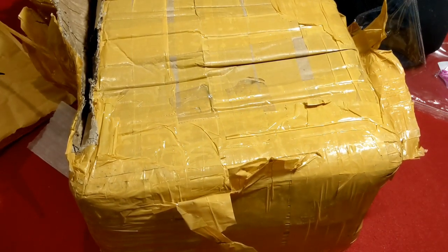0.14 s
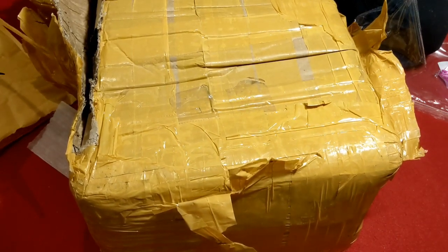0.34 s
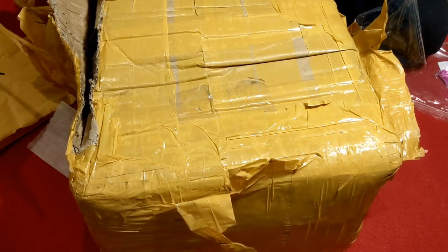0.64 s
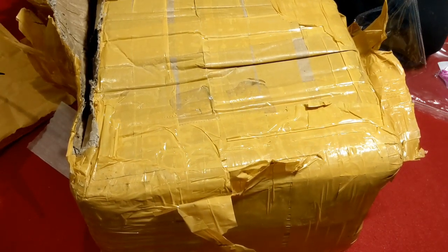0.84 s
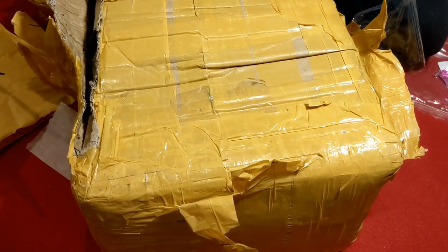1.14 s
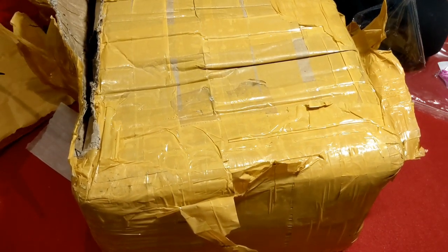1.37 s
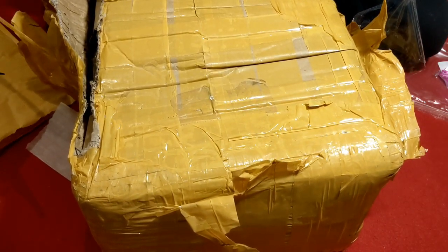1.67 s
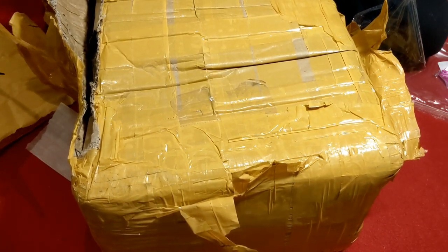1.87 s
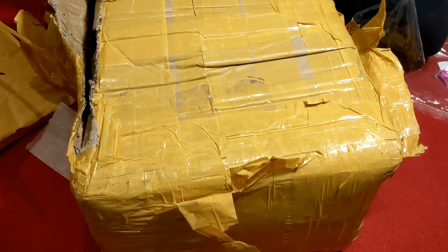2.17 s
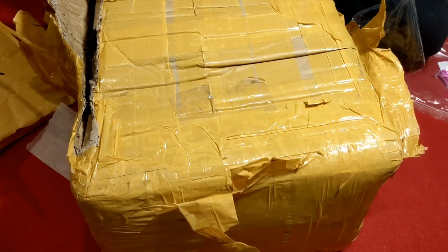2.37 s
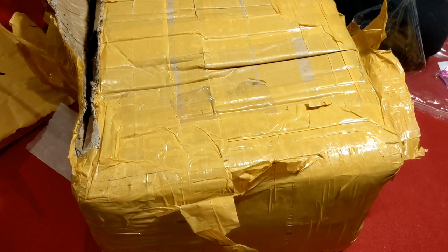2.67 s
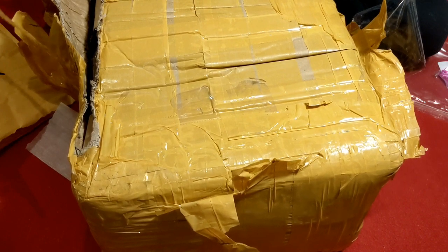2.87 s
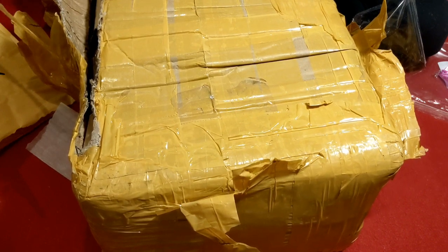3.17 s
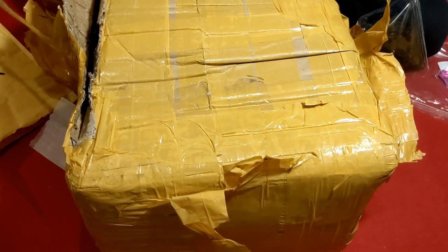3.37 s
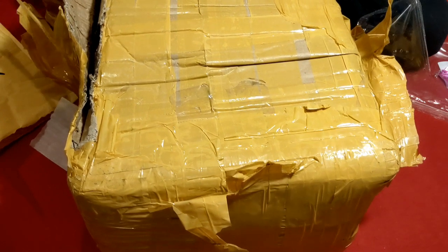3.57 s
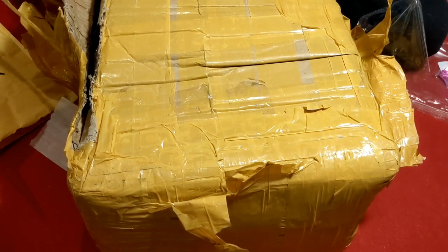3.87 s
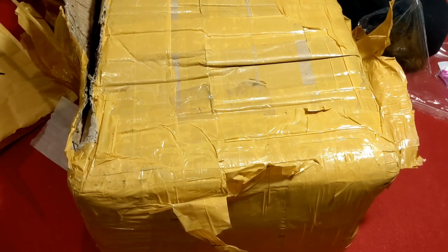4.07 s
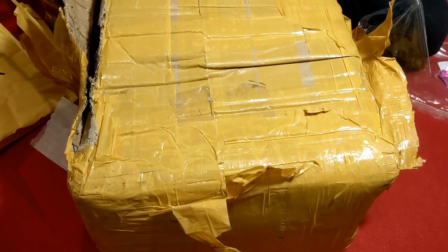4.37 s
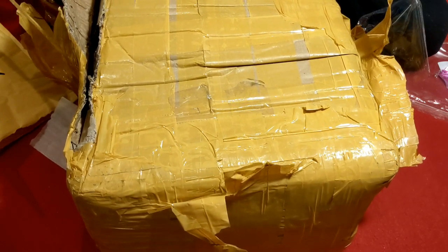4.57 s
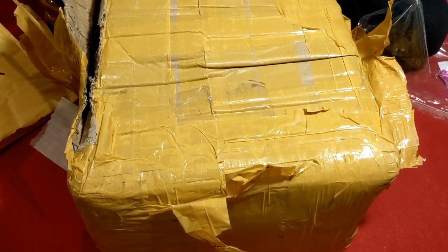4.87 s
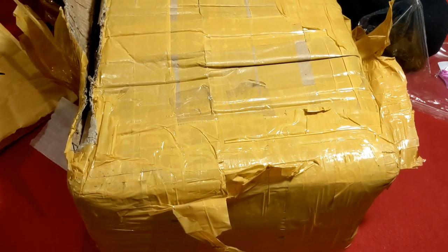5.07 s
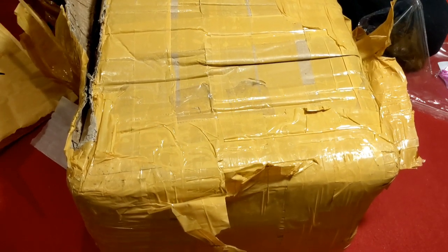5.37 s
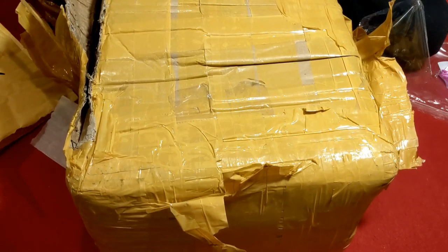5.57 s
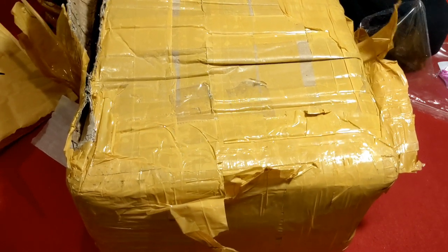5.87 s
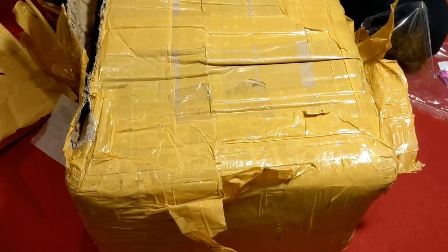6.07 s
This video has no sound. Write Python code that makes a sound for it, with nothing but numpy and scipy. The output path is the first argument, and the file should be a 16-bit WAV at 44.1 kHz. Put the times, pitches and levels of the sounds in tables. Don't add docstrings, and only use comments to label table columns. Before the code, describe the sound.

Scissors saw and pry at a taped hollow cardboard box, with dry crackles, tape snaps and hollow knocks building to hard cracks, close up indoors.

```python
import sys
import numpy as np
from scipy import signal
from scipy.fft import rfft, irfft, next_fast_len
from scipy.io import wavfile
from scipy.ndimage import uniform_filter1d, map_coordinates

SR = 44100
rng = np.random.default_rng(int(sys.argv[2]) if len(sys.argv) > 2 else 0)


def wrap_up_sound(samples):
    columns = np.atleast_2d(samples).T
    tamed = np.clip(columns, -1, 1)
    steps = np.round(tamed * 32767).astype(np.int16)
    wavfile.write(sys.argv[1], SR, steps)


def ratio(d):
    e = np.asarray(d, float) / 20
    return 10 ** e


N = 275184


def unit(x):
    return x / np.sqrt(np.mean(x ** 2) + 1e-20)


def along(points, hz):
    point_hz, value = np.transpose(points)
    return np.interp(np.log(hz + 1), np.log(point_hz + 1), value)


def wobble(per_s):
    knots = rng.standard_normal(int(N * per_s / SR) + 4)
    return map_coordinates(knots, [np.arange(N) * per_s / SR])


def filtered(x, response):
    size = next_fast_len(N + SR // 2)
    hz = np.fft.rfftfreq(size, 1 / SR)
    return irfft(rfft(x, size) * response(hz), size)[..., :N]


def modes(table):
    def response(f):
        total = 0
        for k, (hz, width_hz, db) in enumerate(table):
            damping = 1j * f * width_hz
            total = total + (-1) ** k * ratio(db) * damping / (hz ** 2 - f ** 2 + damping)
        return total
    return response


def spread(pair, alike):
    def shares(hz):
        angle = np.arccos(np.clip(along(alike, hz), -1, 1)) / 2
        return np.array([np.cos(angle), np.sin(angle)])
    mid, side = filtered(pair, shares)
    return np.array([mid + side, mid - side])


def place(out, start_s, sound):
    start = round(start_s * SR)
    out[..., start:start + sound.shape[-1]] += sound


# pitch_hz, level_db (per Hz)
HISS_COLOUR = [(12, -63), (20, -13), (40, -3), (71, -11), (135, -11), (1990, -28), (4010, -30),
               (16300, -33.5)]
# pitch_hz, likeness (0 to 1)
HISS_LIKENESS = [(60, 0.92), (130, 0.35), (300, 0.033), (3000, 0.013)]


def floor():
    hiss_db, hum_hz, hum_db = -65.5, 119.6, -74.5
    air = filtered(rng.standard_normal((2, N)), lambda f: ratio(along(HISS_COLOUR, f)))
    hiss = ratio(hiss_db - 0.5 + 1.7 * wobble(3.4)) * unit(spread(air, HISS_LIKENESS))
    hum_phase = 2 * np.pi * hum_hz * np.arange(N) / SR + 0.62 * wobble(5)
    hum = np.sqrt(2) * ratio(hum_db + 3.0 * wobble(5.83)) * np.sin(hum_phase)
    return hiss + hum


# pitch_hz, fade_s (time to sink 60 dB)
ROOM_FADE = [(200, 0.29), (1500, 0.2), (6000, 0.2), (15000, 0.17)]


def room(x):
    out, step = np.zeros((2, N + SR)), SR // 4
    delay = 220
    for start in range(0, N, step):
        hz, t, noise = signal.stft(rng.standard_normal((2, step)), SR, nperseg=256)
        fade = ratio(-60 * t / along(ROOM_FADE, hz)[:, None])
        tail = signal.istft(noise * fade, SR, nperseg=256)[1]
        tail = tail / np.linalg.norm(tail[0])
        wet = signal.fftconvolve(x[None, start:start + step], tail, axes=1)
        out[:, start + delay:][:, :wet.shape[1]] += wet
    return out[:, :N]


# start_s, peak_db, pitch_hz
CARPET_THUDS = [(0.298, -55, 60), (0.435, -55, 170), (0.979, -51, 103), (1.38, -47.5, 150),
                (1.521, -47.5, 204), (1.53, -53, 36), (1.55, -49, 100), (1.797, -44.5, 165),
                (1.988, -46.5, 135), (1.992, -48.5, 60), (2.717, -50, 45.4), (2.832, -48.5, 90),
                (2.921, -43.5, 260), (3.211, -55, 62), (3.375, -55.5, 61.9), (4.289, -52, 213),
                (4.352, -50.5, 55), (4.387, -46.5, 126), (4.656, -42, 60), (4.656, -41.5, 206),
                (5.534, -40.5, 113), (5.564, -43, 100), (5.597, -47.5, 36), (5.739, -50, 60.5),
                (6.149, -46, 91), (6.134, -49, 300), (6.226, -39.5, 277)]


def thuds():
    out, t = np.zeros(N + SR), np.arange(SR // 6) / SR
    for start_s, peak_db, hz in CARPET_THUDS:
        fade_s = 0.0077 + 3 / hz
        level = ratio(peak_db + 8.5 - 60 * t / fade_s) * (1 - np.exp(-t * hz / 0.32))
        place(out, start_s, level * np.sin(2 * np.pi * hz * t))
    return out[:N]


# start_s, peak_db, pitch_hz
BROAD_KNOCKS = [(0.035, -50, 420), (0.052, -47, 470), (0.064, -50, 444), (0.082, -53, 438),
                (0.09, -55, 557), (0.295, -47.5, 420), (0.434, -57, 870), (0.558, -40, 904),
                (0.7, -43.5, 433), (0.807, -50, 420), (0.949, -47, 880), (0.975, -38, 638),
                (1.344, -40, 960), (1.377, -30, 866), (1.483, -36.5, 686), (1.498, -30.5, 890),
                (1.695, -43, 630), (1.734, -37.5, 420), (1.983, -40, 835), (2.231, -41, 1067),
                (2.244, -51, 577), (2.511, -46.5, 855), (2.596, -45, 435), (2.622, -40, 690),
                (2.657, -38, 453), (2.893, -52, 533), (3.157, -42.5, 1000), (4.294, -33, 1060),
                (4.659, -38.5, 990), (4.735, -35, 356), (4.75, -43, 395), (4.845, -32, 760),
                (6.13, -31.5, 936), (6.229, -30, 1020), (6.2345, -24, 1190)]
# start_s, peak_db, pitch_hz
STIFF_KNOCKS = [(0.575, -42, 1600), (0.754, -40.5, 1410), (3.543, -40, 1190), (4.227, -35, 1330),
                (4.31, -24, 1130), (5.271, -33, 1420), (5.3095, -24, 1450), (5.324, -20, 1430),
                (5.377, -20.5, 1485), (5.7452, -15, 1460), (5.757, -24, 1590), (5.809, -35, 1550),
                (6.1565, -32.5, 1500), (6.1655, -35, 1530)]
# start_s, peak_db, pitch_hz
BLADE_RAPS = [
    (0.366, -50.5, 1710),
    (0.805, -44.5, 1180),
    (2.512, -55, 1490),
    (2.8185, -39.5, 1390),
    (4.651, -20, 1090),
    (4.8495, -27.5, 1250),
    (4.8845, -35, 1900),
    (4.967, -22.5, 1500),
    (4.9672, -32.5, 2750),
]
# start_s, peak_db, pitch_hz
SLIP_TAPS = [(0.966, -43, 1360), (1.2425, -49, 1060), (1.3486, -35, 775), (1.3715, -28, 705),
             (1.5089, -29, 845), (1.6296, -34, 980), (1.6343, -35, 1210), (1.8256, -40, 1030),
             (2.023, -46.5, 1130), (2.3036, -46, 1530), (2.6621, -38, 1150), (2.71, -38, 940),
             (2.9186, -37, 1220), (3.1, -40, 1190), (3.16, -33, 1250), (3.5564, -34.5, 1230),
             (3.6376, -32.5, 1150), (3.8739, -40, 1120), (3.8861, -36, 1190), (3.9796, -35.5, 1400),
             (4.0183, -31, 1230), (4.203, -35.5, 1350), (4.2556, -30, 1160), (4.3584, -24, 1200),
             (4.3752, -21, 970), (4.3796, -24, 1140), (4.387, -25.5, 1390), (4.405, -24, 1470),
             (4.6328, -41, 1010), (4.6638, -34, 930), (4.7417, -35, 1500), (4.8008, -39, 1220),
             (4.872, -37, 890), (4.886, -34, 714), (4.903, -35, 980), (4.96, -49, 1530),
             (5.2868, -24, 1430), (5.3919, -28, 1140), (5.4957, -37, 1100), (5.5093, -32, 1200),
             (5.7154, -29, 1170), (5.7499, -24, 1560), (5.786, -34, 1470), (5.8142, -41, 1500),
             (5.9222, -34, 1540), (5.9429, -31.5, 1740), (6.1081, -41, 980), (6.1256, -41, 1010),
             (6.137, -31, 1000)]


def knocks():
    out, t = np.zeros(N + SR), np.arange(SR // 20) / SR
    # events, time to sink 60 dB in s, second pitch over the first, rise in cycles
    kinds = [(BROAD_KNOCKS, 0.024, 1.42, 0.31), (STIFF_KNOCKS, 0.013, 0.82, 0.79),
             (BLADE_RAPS, 0.0063, 0.67, 0.3), (SLIP_TAPS, 0.0099, 0.746, 0.46)]
    for table, fade_s, second, rise_cycles in kinds:
        for start_s, peak_db, hz in table:
            other_hz = hz * second * ratio(0.5 * rng.standard_normal())
            ring = np.sin(2 * np.pi * hz * t) + 0.36 * np.sin(2 * np.pi * other_hz * t)
            level = ratio(peak_db - 1.8 - 60 * t / fade_s) * (1 - np.exp(-t * hz / rise_cycles))
            place(out, start_s, level * ring)
    return out[:N]


def burst(hz, width, fade_s, kick):
    t = np.arange(SR // 20) / SR
    fade = ratio(-60 * t / fade_s) + 0.13 * ratio(-60 * t / 0.025)
    grit = rng.standard_normal((3, len(t))) * fade
    grit = grit[0] + 1.12 * grit[1:]
    grit[:, 0] = kick
    edges_hz = np.clip([hz / width, hz * width], 100, 16000)
    band = signal.butter(2, edges_hz, "bandpass", fs=SR, output="sos")
    crack = signal.sosfilt(band, grit)
    return crack / np.abs(crack).max()


# start_s, peak_db, pitch_hz, film_tick_db (over the snap)
TAPE_SNAPS = [(0.293, -51, 2930, -25), (0.4351, -45.5, 4150, -3), (0.5587, -34, 4700, -4.5),
              (0.698, -47.5, 3440, 11), (0.979, -59, 2600, -25), (1.188, -43.5, 5700, -14),
              (1.3757, -41.5, 2800, -25), (1.497, -51, 2690, -25), (1.985, -44.5, 3050, 5),
              (2.304, -44, 5530, -9), (2.729, -47, 5900, 8), (2.907, -47, 3870, -25),
              (2.914, -42, 4000, -25), (2.915, -35.5, 3680, -4), (2.956, -39.5, 4750, -23),
              (3.158, -35, 3500, -27), (3.855, -45.5, 4080, 2), (4.551, -52, 5730, -4.5),
              (4.6507, -29, 4170, -14), (4.7357, -37, 3350, -15), (4.8487, -46.5, 3260, 8.5),
              (4.9669, -34.5, 2120, -8), (5.269, -48, 3180, -1), (5.31, -32, 3570, -22),
              (5.3786, -34.5, 3250, -25), (5.394, -39, 3060, -36), (5.716, -37, 3700, -24.5),
              (5.7459, -27.5, 3100, -6.5), (5.758, -48, 3260, -25), (6.125, -38.5, 3540, -25),
              (6.136, -40, 4230, -25), (6.2304, -50, 2330, -25)]
# start_s, peak_db, pitch_hz
FIBRE_CRACKS = [(0.561, -55, 4680), (1.055, -53, 3660), (1.1898, -50, 5600), (1.4985, -36, 2550),
                (2.233, -46, 2930), (2.2438, -47, 4000), (2.3323, -47, 3650), (2.511, -48, 2940),
                (2.6506, -46, 2890), (2.893, -42, 3400), (3.015, -48, 3000), (3.1424, -42.9, 3740),
                (3.163, -30.5, 3860), (4.2018, -43.5, 4570), (4.229, -41, 4130), (4.2821, -48, 3810),
                (4.2917, -35, 3800), (4.345, -40, 3970), (4.6512, -39, 2400), (4.7403, -37.5, 3700),
                (4.9015, -50, 2400), (5.029, -40, 3100), (5.0324, -36, 3850), (5.055, -34.5, 3230),
                (5.28, -32, 3000), (5.295, -33, 3000), (5.3258, -35, 3410), (5.3355, -46, 3480),
                (5.417, -55, 3240), (5.4222, -46, 3770), (5.539, -40, 3230), (5.543, -41, 3360),
                (5.569, -35, 4000), (5.671, -51, 3240), (5.6853, -42, 3020), (5.7242, -41, 3160),
                (5.7497, -25.5, 3900), (5.813, -44, 3250), (5.987, -48, 4540), (6.008, -47, 2400)]
# start_s, peak_db, pitch_hz
FILM_TICKS = [(0.5036, -48, 11050), (0.5066, -48, 9300), (0.5603, -39, 6590), (1.245, -48.5, 8900),
              (1.434, -44, 9600), (1.485, -48, 8050), (1.6816, -49, 9120), (1.6854, -49, 11880),
              (1.697, -38, 11770), (1.7188, -42.3, 12250), (1.7343, -36, 10600), (1.759, -44, 11460),
              (1.7716, -38, 12000), (1.7803, -34, 11310), (1.7997, -34.5, 11610), (1.9748, -49.8, 12050),
              (1.9877, -52, 9340), (2.0086, -41, 7800), (2.216, -43, 11150), (2.233, -42, 13260),
              (2.2435, -45, 12170), (2.2858, -44, 9320), (2.302, -48, 7470), (2.3054, -41, 6360),
              (2.3324, -38, 13300), (2.5673, -42, 10000), (2.655, -41, 11540), (2.659, -39, 11760),
              (2.7183, -34.5, 11040), (2.7213, -40.7, 10110), (2.8183, -39, 11590), (3.0994, -38, 8920),
              (3.1029, -36, 9400), (3.1152, -40, 11330), (3.659, -43, 10960), (4.2017, -38.5, 10010),
              (4.2277, -43, 10650), (4.2819, -48, 8160), (4.2927, -40.4, 10300), (4.301, -37, 9800),
              (4.3337, -35, 13690), (4.3714, -34.3, 5860), (4.736, -39.5, 11530), (4.8526, -56, 6570),
              (5.2842, -45, 10190), (5.469, -49, 12320), (5.518, -34.9, 11650), (5.5694, -32, 12470),
              (5.572, -34, 8250), (5.757, -36.5, 7800), (5.7733, -53, 8040), (5.8136, -43.5, 9220),
              (5.9867, -42, 9670), (5.9979, -48.5, 13680)]


def snaps():
    out = np.zeros((2, N + SR))
    for start_s, db, hz, film_db in TAPE_SNAPS:
        place(out, start_s, ratio(db + 3.5) * burst(hz, width=1.265, fade_s=0.0034, kick=4.5))
        if film_db > -20:
            tick = burst(7600, width=1.42, fade_s=0.011, kick=5.5)
            place(out, start_s, ratio(db + film_db + 2.0) * tick)
    for start_s, db, hz in FIBRE_CRACKS:
        place(out, start_s, ratio(db + 0.5) * burst(hz, width=1.19, fade_s=0.019, kick=7.1))
    for start_s, db, hz in FILM_TICKS:
        place(out, start_s, ratio(db + 2.0) * burst(hz, width=1.5, fade_s=0.0098, kick=3.2))
    return out[:, :N]


FALL_SPEED = [0.89, 0.96, 0.92]


def humps(moves):
    t = np.arange(0, N / SR + 0.002, 0.001)
    start, rise, hold, fall, *levels = np.transpose(moves)[..., None]
    before = np.maximum((start - t) / rise, 0)
    after = np.maximum((t - start - hold) / fall, 0)
    blunt = 0.085
    powers = []
    for db, speed in zip(levels, FALL_SPEED):
        drop_db = 20 * (np.hypot(before + speed * after, blunt) - blunt)
        powers.append(np.sum(ratio(2 * (db - drop_db)), axis=0))
    return t, np.array(powers)


# start_s, panel_db, blade_db (over panel), tape_db (over panel)
SCISSOR_JERKS = [(0.56, -62, 5.5, -2), (0.7, -59.5, 0.5, 0), (0.753, -64.5, -3, -8), (0.953, -56, -12, -25),
                 (1.19, -89, 17, 19.5), (1.369, -63.5, 8, 6.5), (1.485, -57.5, 3, -2),
                 (1.5, -45, -3.5, -8.5), (1.701, -52.5, -6.5, -5.5), (1.983, -58.5, -4, -5),
                 (2.23, -62.5, -2, 0.5), (2.592, -64, 2, -4), (2.896, -59, -7, -13),
                 (3.542, -54.5, -11, -18), (4.653, -66, -19, -25), (4.736, -46, -11, -14),
                 (4.847, -51.5, -5, -17), (5.262, -52, 1, -11), (5.498, -46, 0, -20), (5.38, -48, -3, -10),
                 (5.748, -34.5, -11.5, -22), (6.108, -56, -3, -8)]
# peak_s, swell_s, panel_db, blade_db and tape_db (over panel)
SCISSOR_BITES = [(0.035, 0.06, -83.5, 2, 9), (0.303, 0.1, -72.5, 1, 4.5), (0.447, 0.045, -75.5, 7, 9.5),
                 (0.976, 0.024, -48, -6.5, -10.5), (1.079, 0.034, -71, -7, -5),
                 (1.339, 0.062, -58, -6, -6.5), (1.633, 0.024, -48, -7, -11), (2.305, 0.11, -69, 4, 0.5),
                 (2.514, 0.057, -61, 0, 1.5), (2.655, 0.015, -51.5, -3, -2.5), (2.914, 0.021, -50, 1, -8.5),
                 (3.004, 0.13, -54, -4.5, -7), (3.163, 0.053, -57.5, 3, -3), (3.641, 0.014, -60, 2, 6.5),
                 (3.747, 0.094, -51, -15, -9.5), (4.016, 0.021, -44.5, -5, -12.5),
                 (4.15, 0.029, -56, -10, -11.5), (4.215, 0.064, -57, -4.5, -8),
                 (4.608, 0.038, -59.5, -20, -20), (5.039, 0.027, -57, 8.5, 7.5),
                 (5.089, 0.014, -46, -10, -22), (5.531, 0.047, -42.5, -6, -21),
                 (5.722, 0.032, -45, -4.5, -10.5), (6.031, 0.087, -56, -5, -9.5),
                 (6.238, 0.022, -37.5, -10, -13)]
# start_s, hold_s, panel_db, blade_db and tape_db (over panel)
SCISSOR_DRAGS = [(1.759, 0.066, -57, -3.5, -6), (2.596, 0.034, -57.5, 0.5, 2),
                 (2.697, 0.13, -61.5, -2, 0.5), (3.08, 0.1, -58, -3, -2.5), (3.298, 0.14, -63.5, -1.5, -5),
                 (3.579, 0.45, -56, -5, -8), (4.243, 0.15, -48, -6, -8.5),
                 (4.336, 0.051, -41.5, -2.5, -7.5), (4.755, 0.048, -58, -4, -9),
                 (4.876, 0.026, -56, -13, -18), (5.015, 0.043, -49, -0.5, -5.5),
                 (5.278, 0.061, -42.5, -4, -13), (5.517, 0.041, -48, 1, 1.5), (5.67, 0.029, -51, -4.5, -7),
                 (5.78, 0.027, -47.5, -9.5, -19), (5.93, 0.0076, -45, -0.5, -7.5),
                 (6.124, 0.06, -51.5, -6.5, -11)]
# start_s, panel_db
LIGHT_CONTACT = [(0, -86), (0.4, -82), (0.8, -77.5), (1.17, -87), (1.3, -78), (1.6, -63.5), (1.92, -80),
                 (2.1, -73.5), (2.43, -85), (2.57, -69.5), (3.5, -66.5), (4.1, -75.5), (4.55, -76.5),
                 (5.15, -70), (5.4, -68.5), (5.62, -58), (5.87, -75), (6.09, -78)]
# peak_s, swell_s, cavity_db
BOX_LEANS = [(0.056, 0.063, -65.5), (0.977, 0.036, -56), (1.375, 0.02, -45.5), (1.635, 0.21, -62.5),
             (1.799, 0.048, -54), (2.652, 0.3, -60.5), (2.914, 0.027, -51.5), (3.1, 0.094, -56),
             (3.34, 0.12, -67), (3.656, 0.23, -61.5), (4.02, 0.03, -55), (4.318, 0.077, -46),
             (5.06, 0.088, -59), (5.31, 0.047, -46.5), (5.535, 0.19, -54), (5.75, 0.083, -53),
             (5.928, 0.044, -50.5), (6.24, 0.43, -58)]
# start_s, cavity_db
BOX_JOLTS = [
    (0.563, -66),
    (0.699, -61),
    (1.501, -54),
    (1.985, -57.5),
    (2.231, -54.5),
    (4.649, -49.5),
    (4.739, -44),
    (4.85, -45),
    (4.969, -49.5),
    (5.265, -45),
]


def effort():
    moves = [(s, 0.0078, 0, 0.05, db, db + blade, db + tape) for s, db, blade, tape in SCISSOR_JERKS]
    for s, swell, db, blade, tape in SCISSOR_BITES:
        moves.append((s, swell, 0, 0.97 * swell, db, db + blade, db + tape))
    for s, hold, db, blade, tape in SCISSOR_DRAGS:
        moves.append((s, 0.024, hold, 0.035, db, db + blade, db + tape))
    t, power = humps(moves)
    contact_db = np.interp(t, *np.transpose(LIGHT_CONTACT))
    power = power + ratio(2 * (contact_db + [[0], [-5], [-8.5]]))
    loads = [(s, swell, 0, 1.53 * swell, db) for s, swell, db in BOX_LEANS]
    loads += [(s, 0.0073, 0, 0.052, db) for s, db in BOX_JOLTS]
    weight = humps(loads)[1] + ratio(2 * -84)
    return [np.interp(np.arange(N) / SR, t, 10 * np.log10(p)) for p in [*power, *weight]]


def slips(per_s, spread_db, clump_db, smooth):
    chance = rng.random(N)
    size = np.minimum(rng.exponential(size=N), 3.5)
    sign = np.sign(rng.random((2, N)) - 0.5)
    rub = rng.standard_normal((2, N))
    kicks = (chance < per_s / SR) * ratio(spread_db * size) * sign
    return (unit(kicks) + smooth * rub) * ratio(clump_db * wobble(90))


def steady(x, seconds, patchy_db):
    grid = signal.stft(x, nperseg=256)[2]
    field = uniform_filter1d(rng.standard_normal(grid.shape[1:]), size=5, axis=0)
    field = uniform_filter1d(field, size=12, axis=1)
    x = signal.istft(grid * ratio(patchy_db * unit(field)), nperseg=256)[1][:, :N]
    local_power = np.abs(uniform_filter1d(x ** 2, int(seconds * SR)))
    return x / np.sqrt(local_power + 0.11 * np.mean(x ** 2))


# pitch_hz, width_hz, level_db
WALL_MODES = [(903, 290, -0.5), (1195, 310, 7), (1302, 384, 6.5), (1600, 367, -0.5)]
# pitch_hz, width_hz, level_db
EDGE_MODES = [(2350, 970, -15), (3260, 450, -11), (4130, 566, -11.5), (6500, 160, -14)]
# pitch_hz, width_hz, level_db
CAVITY_MODES = [(102, 214, -4), (260, 150, 1.5), (420, 70, 4.5), (599, 160, -1.5)]
# pitch_hz, level_db (per Hz)
TAPE_COLOUR = [(2650, -45), (4500, -16), (5300, 5), (6740, 2), (9510, 5.5), (12700, 2), (15900, 6),
               (16900, -9)]


def strokes():
    panel, blade, tape, box = effort()
    tearing = np.clip((panel + 58) / 12, 0, 1) * np.clip((panel - tape) / 12, 0.2, 1)
    rips = slips(700, spread_db=2.8, clump_db=2.5, smooth=0.3)
    slide = slips(1500, spread_db=3.2, clump_db=2.5, smooth=0.45)
    fibres = np.sqrt(tearing) * unit(rips) + np.sqrt(1 - tearing) * unit(slide)
    glue = slips(5000, spread_db=2.0, clump_db=1.1, smooth=0.78)
    bumps = slips(300, spread_db=1.5, clump_db=3.5, smooth=0.83)

    wall_shape, wall_focus = modes(WALL_MODES), modes([(1250, 1300, 0)])
    wall = filtered(fibres, lambda f: wall_shape(f) * wall_focus(f))
    edge = filtered(fibres + 0.58 * glue, modes(EDGE_MODES))
    rasp = filtered(unit(glue) + 0.13 * fibres, lambda f: ratio(along(TAPE_COLOUR, f)))
    rock = filtered(bumps + 0.5 * fibres, modes(CAVITY_MODES))

    out = ratio(panel - 0.3) * steady(wall, seconds=0.022, patchy_db=2.6)
    out += ratio(blade + 1.13) * steady(edge, seconds=0.05, patchy_db=1.27)
    out += ratio(tape + 4.1) * steady(rasp, seconds=0.024, patchy_db=2.8)
    out += ratio(box - 0.3) * steady(rock, seconds=0.16, patchy_db=2.3)
    return out


# pitch_hz, left_over_right_db
LEFT_LOUDER = [(60, -0.5), (250, 4.5), (1200, 4.5), (3000, 3.5), (9000, 2.5), (15000, 1.5)]
# pitch_hz, lag_us (microseconds)
LEFT_LATER = [(300, 260), (1200, 32), (2800, 75), (6000, 46), (12000, 64.5)]


def reach_ports(near):
    def paths(f):
        lag_s = along(LEFT_LATER, f) / 1e6
        delay = np.exp(np.outer([-1, 1], 1j * np.pi * f * lag_s))
        return delay * ratio(np.outer([0.5, -0.5], along(LEFT_LOUDER, f)))
    return filtered(near, paths)


# pitch_hz, likeness (0 to 1)
BOX_LIKENESS = [(60, 0.97), (130, 1), (300, 0.73), (1400, 1), (3000, 0.77), (8000, 0.2)]


def scene():
    breaks = knocks() + thuds() + snaps()
    breaks = np.pad(breaks, [(0, 0), (SR // 1000, 0)])[:, :N]
    near = reach_ports(spread(strokes(), BOX_LIKENESS) + breaks)
    return near + ratio(-10) * room(near.mean(axis=0)) + floor()


def low_pass(x):
    return signal.sosfilt(signal.butter(12, 16710, fs=SR, output="sos"), x)


def record(dry):
    def camera(f):
        share = 0.27 * np.minimum(f / 5200, 1) ** 4
        echo = 1 - share * np.exp(-2j * np.pi * f * 476e-6)
        port = 1 - 0.24 / (1 + ((f - 2014) / 200) ** 2)
        top_cut = ratio(along([(15450, 1.5), (15700, -35), (16700, -35)], f))
        return echo * port * top_cut
    return low_pass(filtered(dry, camera))


dry = scene()
out = record(dry)
wrap_up_sound(out)
```